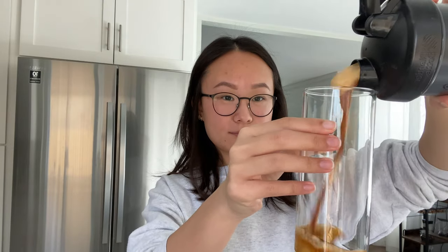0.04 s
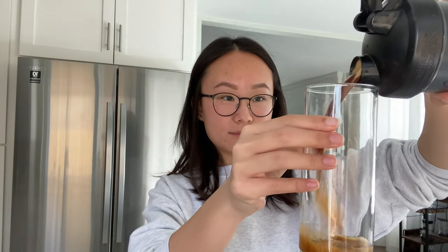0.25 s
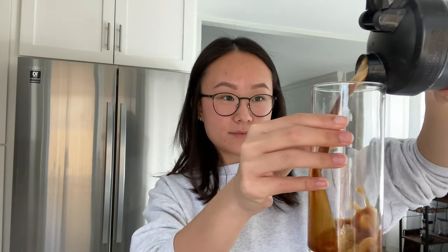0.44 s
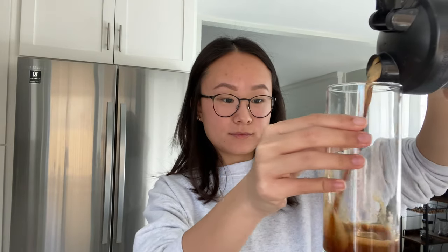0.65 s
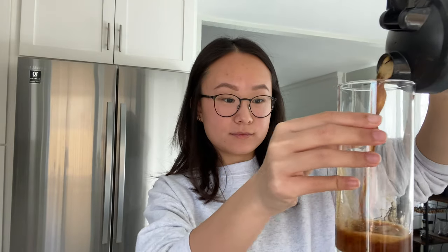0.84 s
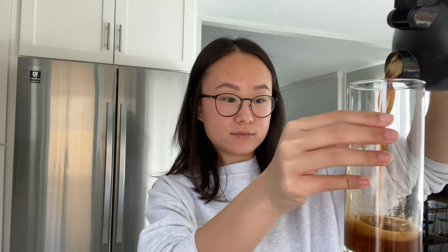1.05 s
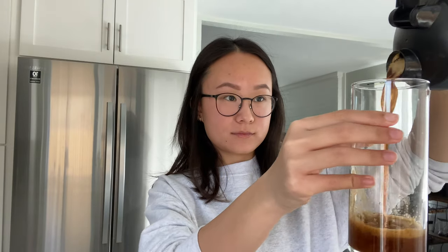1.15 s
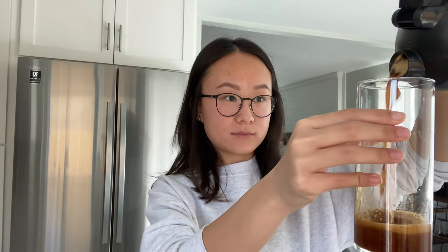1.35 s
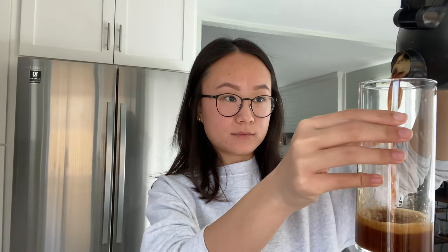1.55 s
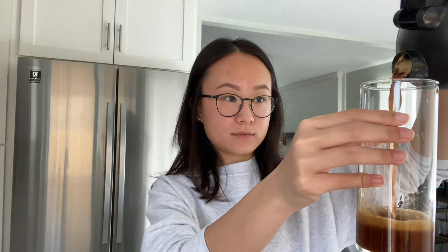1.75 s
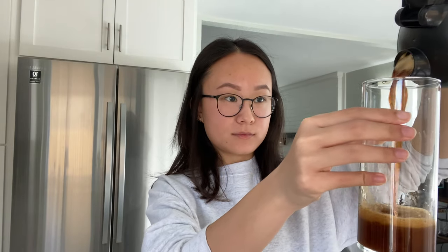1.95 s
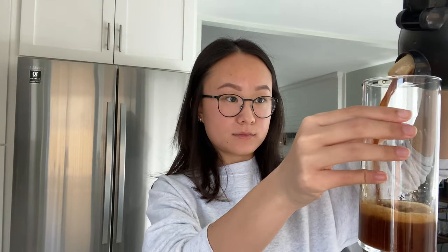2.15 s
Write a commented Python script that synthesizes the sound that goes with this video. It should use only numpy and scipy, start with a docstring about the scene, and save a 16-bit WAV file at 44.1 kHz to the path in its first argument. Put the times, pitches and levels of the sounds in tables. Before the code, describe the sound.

Coffee trickles and gurgles into a tall glass after a few bright glass clinks.

```python
"""Over a faint mains hum, froth begins to tick and splash in a tall glass. The glass rattles against the
spout of a coffee machine: three bright clinks from its wall modes, then a dull knock. Coffee trickles
in: droplets spray, a soft low bump passes, and drops make the air column gulp as froth bubbles burst.
Near the end large bubbles burble and the glass touches lightly once more.
A small kitchen reverberates throughout."""
import sys
import numpy as np
from scipy import signal
from scipy.fft import rfft, irfft, next_fast_len
from scipy.io import wavfile

SR = 44100
rng = np.random.default_rng(int(sys.argv[2]) if len(sys.argv) > 2 else 0)


def transcribe(signal):
    """Save signal, clipped to [-1, 1], as a 16-bit WAV file at the path in sys.argv[1]."""
    frames = np.atleast_2d(signal).T
    limited = np.clip(frames, -1, 1)
    pcm = np.round(limited * 32767).astype(np.int16)
    wavfile.write(sys.argv[1], SR, pcm)


N = 97020

# Spectrum of the room air. Each row: frequency in Hz, relative level in dB.
AIR_SPECTRUM = [(25, -2.5), (150, -2.5), (600, -10.5), (4000, -22), (15000, -29)]
# Soft ringing of the air column. Each row: start in seconds, level in dB, pitch in Hz, t60 in seconds.
COLUMN_RINGS = [(.001, -49.5, 491.4, 0.28), (2.131, -25, 564, 0.13)]
# The stream's fine activity. Each row: time in seconds, levels in dB of small gulps, splashes and ticks.
STREAM_LEVELS = [(0, -85, -50.5, -61.5), (.1, -71.5, -73.5, -68), (0.491, -80, -61.5, -52),
                 (.6, -63.5, -71, -70.5), (.8, -50.5, -68, -70), (0.891, -51, -56.5, -60),
                 (1.351, -48.5, -67.5, -59), (1.458, -60, -64, -65.5), (1.699, -44, -61.5, -59.5),
                 (1.918, -50.5, -59, -63.5), (2.019, -45, -54.5, -60), (2.111, -62, -63, -61.5)]
# Bursting froth bubbles. Each row: start in seconds, relative levels in dB of tick and splash.
FROTH_POPS = [(0.135, -44, -59), (0.17, -38.5, -73), (0.413, -35, -50), (0.4397, -33.5, -53.5),
              (0.4693, -28.5, -83), (0.5631, -34, -55.5), (0.6587, -44.5, -66.5), (0.9348, -36.5, -52.5),
              (0.9681, -42.5, -69), (1.0472, -44, -81.5), (1.1059, -39, -54), (1.3138, -43, -60.5),
              (1.346, -37, -71.5), (1.485, -39.5, -56.5), (1.711, -36, -54.5), (1.8639, -37, -46.5),
              (2.0435, -50, -47),]
# Drips that ring a bubble. Each row: start in seconds, peak level in dB, pitch in Hz.
BUBBLE_DRIPS = [(0.1369, -51, 1490), (0.1856, -52, 3270), (1.638, -49, 1787), (1.708, -46.5, 1827),
                (1.866, -42, 4070), (2.044, -38, 1666)]
# Spectra of four kinds of noise burst. Each row: frequency in Hz, relative level in dB.
TICK_SPECTRUM = [(500, -21.5), (2200, -9), (3700, 4), (5600, -0.5), (7000, 5.5), (9000, 0), (11500, -0.5),
                 (13000, -5), (15500, -17)]
SPLASH_SPECTRUM = [(370, -27), (500, 1.5), (750, -3), (1250, -6), (1720, 5.5), (2200, -10.5), (2800, -3.5),
                   (4000, -17), (7000, -21)]
KNOCK_SPECTRUM = [(100, -40.5), (340, -35.5), (560, -1), (800, -12.5), (1200, -1), (1500, 4.5), (2000, -16),
                  (3000, -9), (6000, -32)]
CRACK_SPECTRUM = [(300, -31.5), (2000, -9.5), (3700, -2.5), (5400, -4), (7000, 1.5), (9500, -0.5),
                  (12500, -13), (15000, -11.5)]
# Glass striking spout. Each row: start in seconds, wall level in dB, treble cutoff in Hz,
# longest wall t60 in seconds, levels in dB of air column, knock and crack.
SPOUT_CONTACTS = [(0.2397, -13.5, 7100, 0.065, -78, -56, -32),
                  (0.2471, -11.5, 4570, 0.18, -23.5, -14, -20.5),
                  (0.2998, -7, 10500, 0.032, -33.5, -32, -19.5),
                  (0.3781, -30.5, 7000, 0.027, -24, -24, -29.5),
                  (2.129, -47, 3560, 0.063, -66, -42.5, -52.5)]
# The spout rattling on. Each row: start in seconds, levels in dB of knock and crack.
SPOUT_RATTLES = [(0.2574, -25, -35), (0.2667, -25, -36.5)]
# Modes of the glass wall and air column. Each row: frequency in Hz, relative level in dB, t60 in seconds.
WALL_MODES = [(3768, -7, .05), (3802, -1, .16), (4484, -1, .062), (6890, -10, .04), (7075, -2, .044),
              (7170, -8, .036), (8418, -6, .042), (9030, -8, .042), (11560, -11, .05), (14200, -18, .035)]
COLUMN_MODES = [(517.4, -2, 0.12), (1561, -9, 0.086), (2490, -23, .17)]
# Droplet showers. Each row: middle and width in seconds, typical droplet level in dB and pitch in Hz.
SHOWERS = [(0.495, 0.033, -39.5, 6870), (1.334, 0.029, -48.5, 5650), (1.534, 0.037, -51.5, 9400),
           (1.994, .06, -49.5, 1910)]
# Drops plunging into the coffee. Each row: time near the peak in seconds, relative level in dB.
BIG_DROPS = [(.595, -49.5), (.664, -50.5), (.846, -49), (.878, -37.5), (.891, -32.5), (.99, -35),
             (1.003, -40.5), (1.026, -38.5), (1.087, -43), (1.118, -39.5), (1.143, -36.5), (1.188, -37),
             (1.227, -36), (1.294, -37), (1.337, -41), (1.359, -46.5), (1.389, -37.5), (1.413, -42),
             (1.451, -40), (1.505, -35), (1.517, -41), (1.537, -40), (1.646, -40), (1.705, -35),
             (1.724, -43.5), (1.751, -43.5), (1.769, -37), (1.798, -33), (1.832, -34), (1.864, -36.5),
             (1.896, -24), (1.951, -38.5), (2.005, -36), (2.025, -38.5), (2.047, -42), (2.081, -38),
             (2.195, -35)]
# Large bubbles. Each row: start in seconds, level in dB, starting pitch in Hz.
LARGE_BUBBLES = [(1.932, -37.5, 470), (2.02, -40.5, 453), (2.128, -37.5, 446)]
# Reverberation of the kitchen. Each row: frequency in Hz, t60 in seconds.
KITCHEN_DECAY = [(200, 0.72), (1000, 0.73), (4000, 0.35), (8000, 0.31), (15000, 0.07)]

HUM_HZ, HUM_DB, AIR_DB = 61, -70, -71.5
TICK_T60_S, SPLASH_T60_S, KNOCK_T60_S, CRACK_T60_S = 0.008, 0.02, 0.017, 0.028
PING_LOW_HZ, PING_HIGH_HZ, PING_DB = 3320, 12500, -2.5
POP_TICK_DB, POP_SPLASH_DB, SPATTER_S, SPATTER_LOSS_DB = -5, 4, 0.012, 6
CHOKE_S, COLUMN_RISE_S = 0.0057, 0.001
LINGER_HZ, LINGER_DB, LINGER_T60_S = 3870, -41, 0.71  # a low wall mode sings on faintly
DROPLETS_PER_S, DROPLET_SPREAD, DROPLET_CYCLES = 700, 0.452, 21
GULP_HZ, GULP_SLIDE_HZ, GULP_SPREAD = 580.6, 85, 0.045
GULP_RISE_S, GULP_LEAD_S, GULP_TAIL_T60_S, GULP_TAIL_DB = 0.0025, 0.0065, 0.12, -8
OVERTONE_HZ, OVERTONE_DB, OVERTONE_T60_S = 1713, -18, 0.027
BIG_GULP_DB, PLUNGE_DB = -1.5, -18.5
BURBLE_FALL_HZ_PER_S, BURBLE_T60_S = 900, 0.097
GLASS_ROOM_DB, GURGLE_ROOM_DB, SPATTER_ROOM_DB, ROOM_DELAY_S = -18, -17, -11, 0.008
LOW_CUT_HZ, TOP_HZ = 410, 15400


def amp(db):
    """Amplitude ratio of a level in decibels."""
    return 10 ** (np.asarray(db) / 20)


def along(points, hz):
    """Interpolation of (Hz, value) points on a logarithmic frequency axis."""
    known_hz, values = np.transpose(points)
    return np.interp(np.log(hz + 1), np.log(known_hz + 1), values)


def ages():
    """Time in seconds since the onset of one sound."""
    return np.arange(SR * 3 // 5) / SR


def fade(t, t60):
    """Exponential damping: the level falls 60 dB in t60 seconds."""
    return np.exp(-np.log(1000) * t / t60)


def ring(hz, t60, attack_s):
    """Free vibration of one mode: a damped sinusoid."""
    t = ages()
    return np.sin(2 * np.pi * hz * t) * fade(t, t60) * (1 - np.exp(-t / attack_s))


def burst(spectrum, t60, size=2048):
    """Source and filter: a dying puff of noise excites a minimum-phase filter with this spectrum."""
    t = np.arange(size) / SR
    gain = amp(along(spectrum, np.fft.rfftfreq(size, 1 / SR)))
    cepstrum = irfft(np.log(gain / np.sqrt(np.mean(gain ** 2))), size)
    causal_fold = np.r_[1, np.full(size // 2 - 1, 2), 1, np.zeros(size // 2 - 1)]
    response = np.exp(rfft(cepstrum * causal_fold))
    puff = rng.standard_normal(size) * fade(t, t60) * (1 - np.exp(-t / 0.00024))
    return irfft(rfft(puff) * response, size)


def add(track, start, sound):
    """Superposition: a sound joins the track at its start in seconds."""
    part = track[max(round(start * SR), 0):][:len(sound)]
    part += sound[:len(part)]


def scatter(count, column, spread_db):
    """A random point process: (start, dB) events whose levels follow a column of STREAM_LEVELS."""
    jitter, strength = rng.random((count, 2)).T
    starts = (np.arange(count) + 2 * jitter) / count * N / SR
    curve = np.transpose(STREAM_LEVELS)
    levels = np.interp(starts, curve[0], curve[column]) + spread_db * (2 * strength - 1)
    return zip(starts, levels)


def background():
    """The noise floor: a pure tone of mains hum over the coloured noise of room air."""
    hum = np.sqrt(2) * np.sin(2 * np.pi * HUM_HZ * np.arange(N) / SR)
    colour = amp(along(AIR_SPECTRUM, np.fft.rfftfreq(N, 1 / SR)))
    air = irfft(rfft(rng.standard_normal(N)) * colour, N)
    return amp(HUM_DB) * hum + amp(AIR_DB) * air / air.std()


def air_column():
    """Pipe resonance: the air in the glass rings softly at its fundamental."""
    out = np.zeros(N)
    for start, db, hz, t60 in COLUMN_RINGS:
        add(out, start, amp(db) * ring(hz, t60, attack_s=0.0022))
    return out


def bubble(hz, t60_cycles=78):
    """Bubble resonance at constant Q: every pitch dies away in the same number of cycles."""
    t = ages()[:SR // 16]
    return np.sin(2 * np.pi * hz * t) * fade(t, t60_cycles / hz)


def tick():
    """Film rupture: a bursting bubble gives a snap of random colour and a ping of random pitch."""
    snap = burst([(hz, db + rng.normal(0, 7)) for hz, db in TICK_SPECTRUM], TICK_T60_S)
    ping_hz = PING_LOW_HZ * (PING_HIGH_HZ / PING_LOW_HZ) ** rng.random()
    add(snap, 0, amp(PING_DB) * bubble(ping_hz))
    return snap


def froth():
    """Superposed transients: pops trailed by spatter, and drips, stand out of fine ticks and splashes."""
    out = np.zeros(N)
    pop_delay_s = 0.0008
    for start, tick_db, splash_db in FROTH_POPS:
        pop_db = tick_db + POP_TICK_DB
        add(out, start + pop_delay_s, amp(pop_db) * tick())
        add(out, start + SPATTER_S * rng.random(), amp(pop_db - SPATTER_LOSS_DB) * tick())
        splash = burst(SPLASH_SPECTRUM, SPLASH_T60_S)
        add(out, start + pop_delay_s, amp(splash_db + POP_SPLASH_DB) * splash)
    for start, db, hz in BUBBLE_DRIPS:
        add(out, start, amp(db) * bubble(hz))
    for start, db in scatter(count=480, column=3, spread_db=8.5):
        add(out, start, amp(db) * tick())
    for start, db in scatter(count=230, column=2, spread_db=11):
        add(out, start, amp(db) * burst(SPLASH_SPECTRUM, SPLASH_T60_S))
    return out


def clinks():
    """Impact excitation: each contact rings the wall and air column and knocks the rattling spout."""
    out, t = np.zeros(N), ages()
    ends = [row[0] for row in SPOUT_CONTACTS[1:]] + [N / SR]
    for contact, end in zip(SPOUT_CONTACTS, ends):
        start, wall_db, cutoff_hz, longest_t60, air_db, knock_db, crack_db = contact
        wall = np.zeros_like(t)
        for hz, db, t60 in WALL_MODES:
            gain = amp(db + rng.normal(0, 1)) / np.hypot(1, (hz / cutoff_hz) ** 2)
            wall += gain * ring(hz, min(t60, longest_t60), attack_s=0.00098)
        choke = np.exp(-np.maximum(t - (end - start), 0) / CHOKE_S)  # the next contact damps the wall
        air = sum(amp(db) * ring(hz, t60, COLUMN_RISE_S) for hz, db, t60 in COLUMN_MODES)
        add(out, start, amp(wall_db) * wall * choke + amp(air_db) * air)
        add(out, start, amp(wall_db + LINGER_DB) * ring(LINGER_HZ, LINGER_T60_S, CHOKE_S))
        add(out, start, amp(crack_db) * burst(CRACK_SPECTRUM, CRACK_T60_S))
        add(out, start, amp(knock_db) * burst(KNOCK_SPECTRUM, KNOCK_T60_S))
    for start, knock_db, crack_db in SPOUT_RATTLES:
        add(out, start, amp(knock_db) * burst(KNOCK_SPECTRUM, KNOCK_T60_S))
        add(out, start, amp(crack_db) * burst(CRACK_SPECTRUM, CRACK_T60_S))
    return out


def sprays():
    """Jet breakup: the stream parts into showers of droplets, each with a brief pitch of its own."""
    out = np.zeros(N)
    for middle, width_s, db, typical_hz in SHOWERS:
        for when, pitch, size in rng.standard_normal((int(width_s * DROPLETS_PER_S), 3)):
            hz = min(typical_hz * np.exp(DROPLET_SPREAD * pitch), TOP_HZ)
            droplet = ring(hz, t60=DROPLET_CYCLES / hz, attack_s=0.5 / hz)
            add(out, middle + width_s * when / 2, amp(db + 2 * size) * droplet)
    return out


def bump(start=0.528, db=-49.5):
    """A damped low mode with a slow onset, heard as one soft bump."""
    out = np.zeros(N)
    add(out, start, amp(db) * ring(hz=139.6, t60=0.15, attack_s=0.019))
    return out


def gulp(hz):
    """Resonant build-up: a plop swells and slides up to the air column's note, under one overtone."""
    t = ages()
    rise = t / GULP_RISE_S
    swell = (rise / 2) ** 2 * np.exp(2 - rise)
    tail = amp(GULP_TAIL_DB) * fade(t, GULP_TAIL_T60_S) * (1 - np.exp(-rise / 2))
    phase = 2 * np.pi * np.cumsum(hz - GULP_SLIDE_HZ * np.exp(-rise / 2)) / SR
    overtone = amp(OVERTONE_DB) * ring(OVERTONE_HZ, OVERTONE_T60_S, COLUMN_RISE_S)
    return (swell + tail) * np.sin(phase) + overtone


def gurgle():
    """Drop impacts excite the air column: big drops splash and gulp over a patter of small ones."""
    out = np.zeros(N)
    for peak_s, db in BIG_DROPS:
        start = peak_s - GULP_LEAD_S
        add(out, start, amp(db + BIG_GULP_DB) * gulp(GULP_HZ))
        add(out, start, amp(db + PLUNGE_DB) * burst(SPLASH_SPECTRUM, SPLASH_T60_S))
    for start, db in scatter(count=105, column=1, spread_db=3.5):
        add(out, start, amp(db) * gulp(GULP_HZ * np.exp(rng.normal(0, GULP_SPREAD))))
    return out


def burbles():
    """Large bubbles resonate below the air column's note, falling in pitch."""
    out, t = np.zeros(N), ages()
    for start, db, hz in LARGE_BUBBLES:
        add(out, start, amp(db) * ring(hz - BURBLE_FALL_HZ_PER_S * t / 2, BURBLE_T60_S, GULP_RISE_S))
    return out


def radiated(sound):
    """Radiation efficiency: the glass gives off little below the note of its air column."""
    return signal.sosfilt(signal.butter(4, LOW_CUT_HZ, "highpass", fs=SR, output="sos"), sound)


def kitchen(sound):
    """Diffuse reverberation: convolution with noise in which each frequency dies at its own rate."""
    hz, t, spectra = signal.stft(rng.standard_normal(SR), SR, nperseg=256)
    decay = fade(t, along(KITCHEN_DECAY, hz)[:, None])
    tail = signal.istft(spectra * decay, SR, nperseg=256)[1]
    response = np.pad(tail / np.linalg.norm(tail), (round(ROOM_DELAY_S * SR), 0))
    return signal.fftconvolve(sound, response)[:N]


def scene():
    """The direct and reverberant fields of glass and coffee add over the noise floor."""
    floor = background() + bump()
    glass = radiated(clinks())
    glass_room = amp(GLASS_ROOM_DB) * kitchen(glass)
    plops = radiated(air_column() + gurgle() + burbles())
    spatter = froth() + sprays()
    pour_room = kitchen(amp(GURGLE_ROOM_DB) * plops + amp(SPATTER_ROOM_DB) * spatter)
    return (floor + glass + glass_room + plops + spatter + pour_room)[None]


def record(dry):
    """Band limiting: a steep low-pass filter removes the highest treble."""
    size = next_fast_len(N + SR // 2)
    hz = np.fft.rfftfreq(size, 1 / SR)
    gain = 1 / np.hypot(1, (hz / TOP_HZ) ** 60)
    return irfft(rfft(dry, size) * gain, size)[:, :N]


dry = scene()
out = record(dry)
transcribe(out)
```